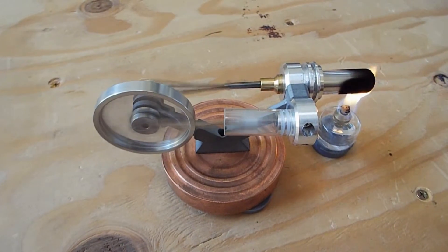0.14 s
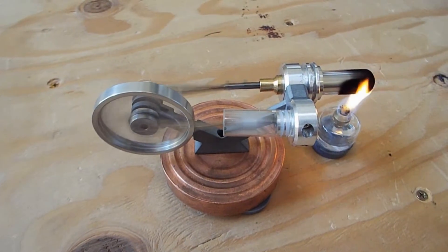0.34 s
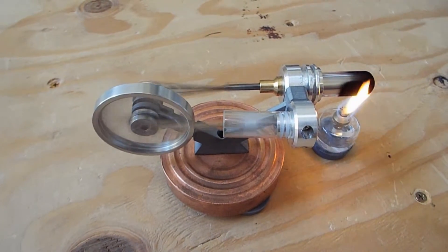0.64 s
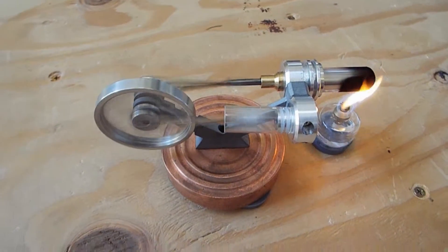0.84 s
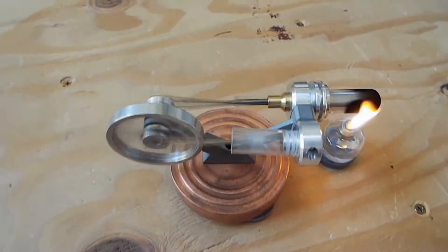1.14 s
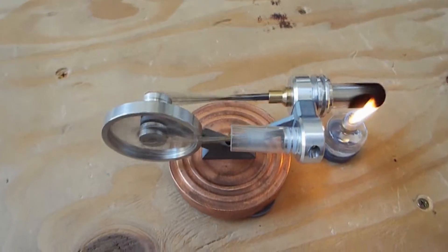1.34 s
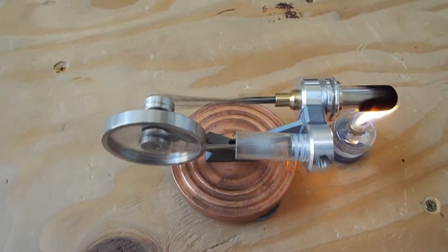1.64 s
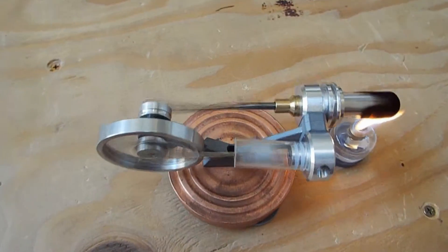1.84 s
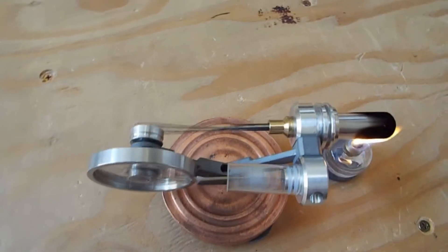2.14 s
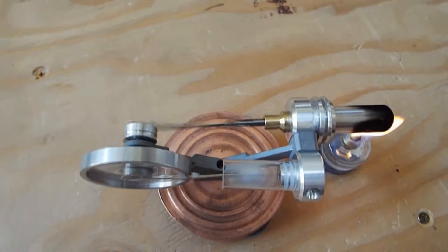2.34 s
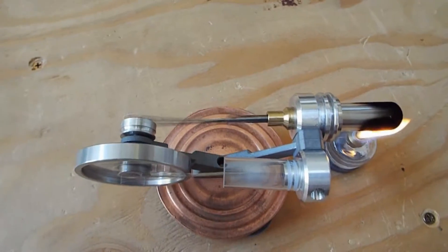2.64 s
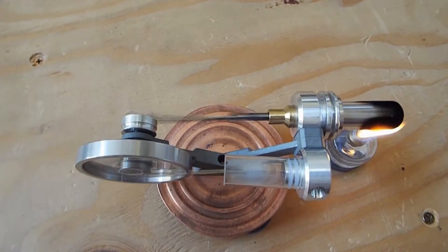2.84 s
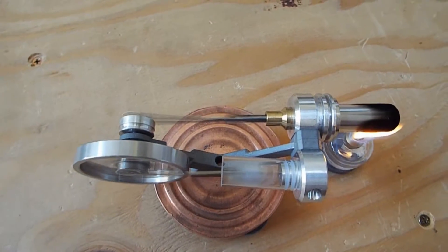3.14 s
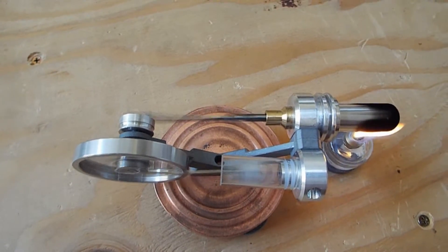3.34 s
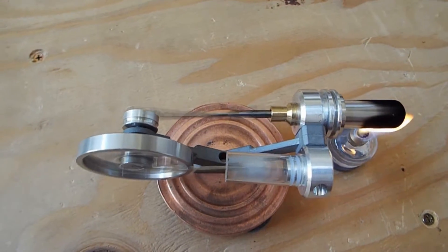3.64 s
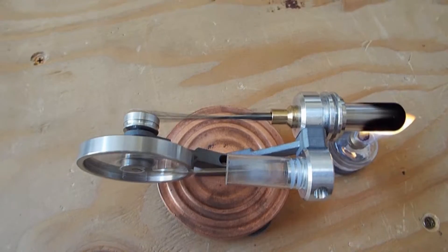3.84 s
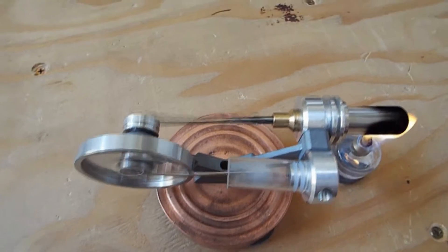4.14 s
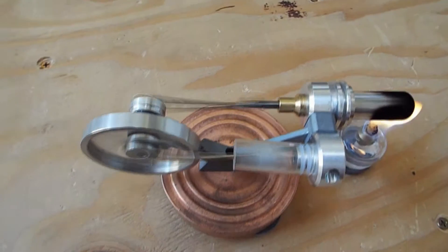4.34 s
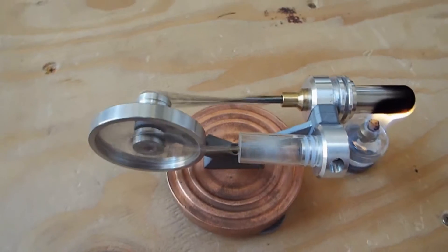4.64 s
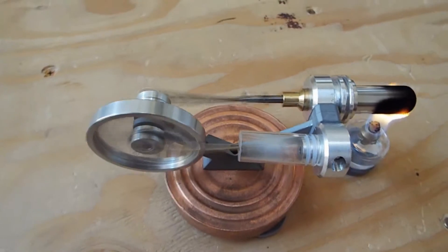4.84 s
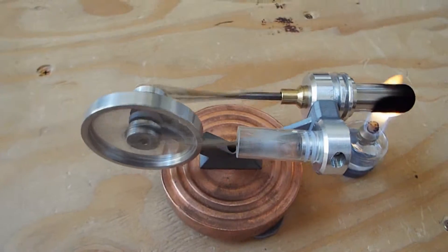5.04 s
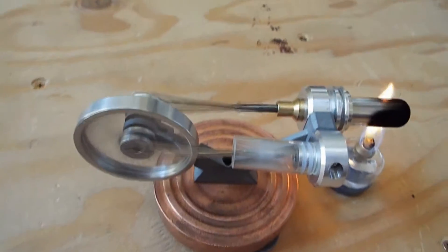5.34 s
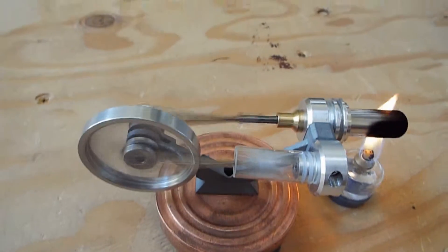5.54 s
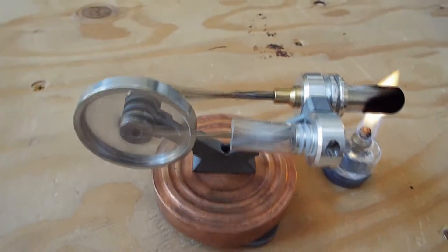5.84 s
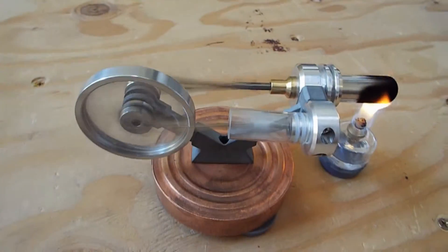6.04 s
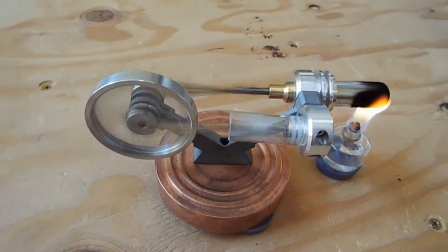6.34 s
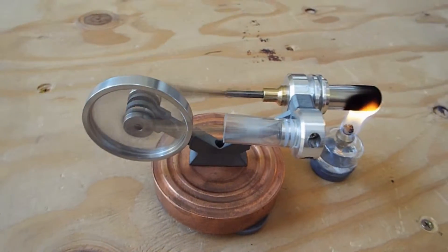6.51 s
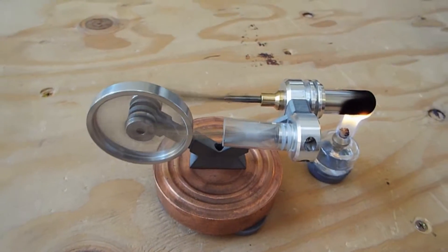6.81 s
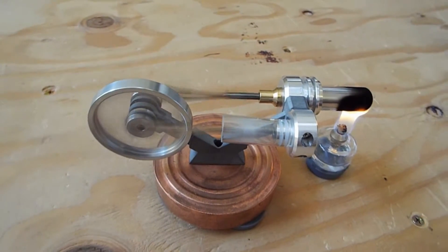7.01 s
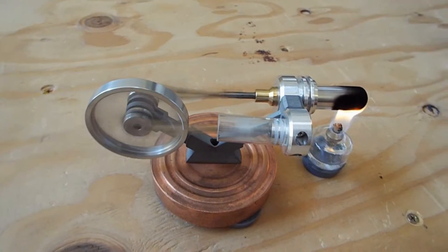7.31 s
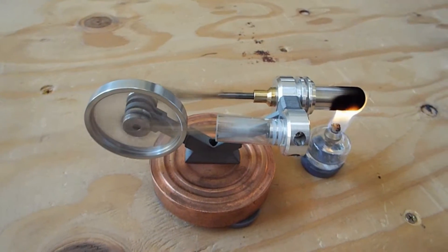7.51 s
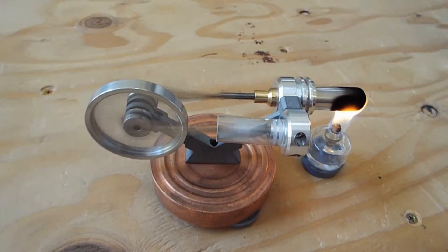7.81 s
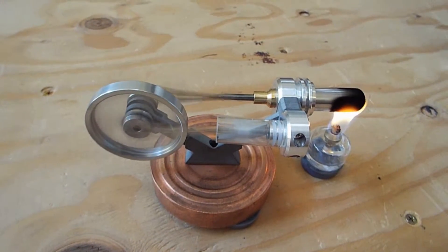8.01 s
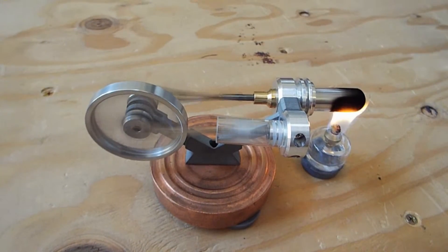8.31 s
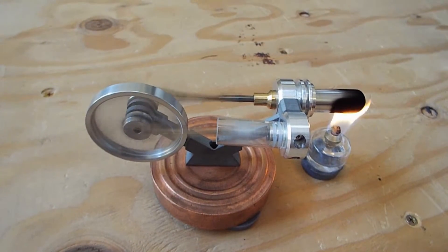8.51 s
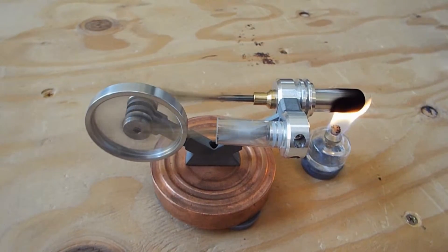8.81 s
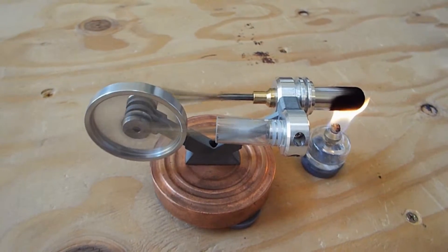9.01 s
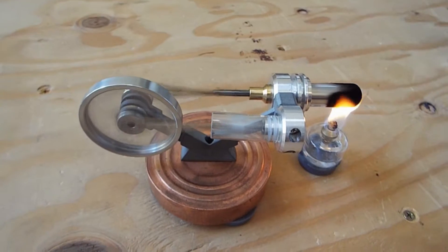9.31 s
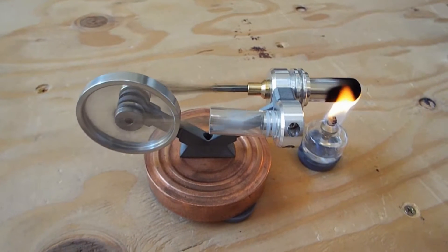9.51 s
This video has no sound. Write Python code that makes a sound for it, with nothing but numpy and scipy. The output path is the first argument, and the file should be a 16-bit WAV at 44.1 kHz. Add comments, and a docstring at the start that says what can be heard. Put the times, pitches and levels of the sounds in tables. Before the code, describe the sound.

From the start a small engine is already running at speed, close and dry: a fast, even metallic rattle, about twenty-six turns a second with several knocks per turn, ringing brightest around three to five kilohertz, with grainy rubbing and thin flickering whistles. It sits on the right. The left is a dull, covered rush with faint muffled engine. From 0.7 s sharp ticks and short buzzing trains crackle on the left, with quick dips in level; the left mutes at about 0.9-1.0 s, broken by a strong pop. The ring brightens around 1.5-4 s as the view tilts, with pops near 2.8-3.5 s. Crackling is dense from 4 to 6 s, with level sagging around 5.4-5.8 s and low puffs near 5.1 s. More puffs come at 7-7.9 s, then sparser ticks and soft thumps to 9 s. Crackle returns about 9-9.4 s, the left cuts out briefly at 9.5 s, and the engine runs on to the end at 9.7 s.

```python
"""Hot-air engine on a wooden table

A small engine spins close to a hand-held camera with two microphones, and the camera tilts round it.
Right: the linkage knocks four times a turn and rubs, ringing the metal frame; thin whistles flicker.
Left: a covered port passes a dull rush, low puffs and some engine sound through the camera body.
It crackles in even trains and lone ticks; the engine and rush sag in level, and the left mutes twice
but for the strong ticks and pops. The pops are louder on the left and fainter on the right."""
import sys
import numpy as np
from scipy import signal
from scipy.io import wavfile
from scipy.ndimage import uniform_filter1d

SR = 44100
rng = np.random.default_rng(int(sys.argv[2]) if len(sys.argv) > 2 else 0)


def wrap_up_sound(samples):
    """Save the sound to the file named by the first command line argument, as 16-bit audio."""
    columns = np.atleast_2d(samples).T
    # keep every value between -1 and 1, then stretch to whole-number steps
    tamed = np.clip(columns, -1, 1)
    steps = np.round(tamed * 32767).astype(np.int16)
    wavfile.write(sys.argv[1], SR, steps)


N = 426006
T = np.arange(N) / SR

# What each tilt of the camera hears, interpolated between rows; levels before each side's own gain:
# t/s, overall level/dB, then relative to it: low ring/dB, main ring/dB, upper rings/dB, top whistle/dB
VIEW_TABLE = [(0.0, -43, 4, 11, 1, -15), (.7, -44, 2, 11, 1, -13), (1.2, -48, 2, 13, 3, -12),
              (1.55, -45, 1, 13, 4, -14), (2.0, -45, 3, 14, 6, -13), (2.6, -44, 1, 12, 4, -16),
              (3.7, -44, 2, 14, 6, -14), (4.45, -45.5, 4, 13, 4, -11), (4.8, -45, 3, 11, 3, -14),
              (5.2, -43, 3, 10, 3, -14), (5.4, -48, 3, 9, 2, -12), (5.75, -49, 4, 9, 2, -11),
              (6.05, -43, 5, 10, 1, -13), (7.0, -43.5, 5, 9, 1, -12), (8.2, -43, 5.5, 8, 2, -11),
              (9.0, -43.5, 5.5, 9, 1, -12), (9.3, -43, 4, 6, 1, -13), (9.66, -43, 4, 6, 1, -14)]

# Evenly spaced trains of left ticks, each starting just after the bottom of a dip in level:
# t/s of first tick, number of ticks (minus: jumps downward), first jump level/dB, dip depth/dB
TICK_TRAINS = [(.7476, -5, -23, 4), (.7999, 4, -25, 6), (.862, -3, -34, 9), (1.0266, 6, -38, 0),
               (1.0521, -12, -38, 0), (1.1337, -7, -32, 0), (1.1946, -6, -20, 6), (1.2478, 7, -29, 3),
               (1.3091, -4, -21, 3), (1.3504, 5, -29, 7), (1.4254, -3, -22, 4), (1.497, -5, -31, 6),
               (1.6257, 4, -23, 9), (1.6795, -4, -25, 1), (1.7439, 4, -24, 2), (1.7987, -3, -26, 4),
               (1.8631, 4, -23, 2), (1.9327, -4, -23, 10), (2.0469, -3, -24, 1), (2.271, 3, -26, 1),
               (2.4718, -3, -28, 2), (3.0009, -3, -27, 1), (3.0906, -4, -26, 1), (3.1841, 4, -30, 1),
               (3.3963, -4, -25, 1), (3.4394, 3, -25, 2), (3.5273, 6, -30, 1), (3.8227, -2, -24, 3),
               (3.9202, -3, -23, 10), (3.9466, 8, -22, 8), (3.9876, 3, -24, 5), (4.0503, -5, -27, 13),
               (4.1567, -3, -23, 4), (4.2053, 4, -30, 9), (4.2626, -3, -25, 1), (4.3115, 4, -29, 7),
               (4.359, -3, -25, 2), (4.41, -2, -27, 8), (4.4506, -5, -24, 3), (4.5026, 4, -27, 2),
               (4.5925, 4, -25, 1), (4.6714, 3, -25, 3), (4.965, 2, -28, 9), (4.9869, 4, -23, 7),
               (5.0489, -4, -27, 11), (5.1546, -3, -26, 11), (5.1802, -5, -28, 0), (5.2548, 4, -30, 10),
               (5.2892, 6, -26, 9), (5.3466, 5, -20, 5), (5.4282, -4, -24, 10), (5.4637, 4, -26, 4),
               (5.5734, -3, -27, 9), (5.6042, 6, -25, 8), (5.6479, 4, -23, 7), (5.6933, -5, -27, 6),
               (5.7348, -4, -21, 2), (5.7722, 3, -25, 1), (5.8105, -2, -26, 10), (5.8648, 14, -22, 10),
               (5.9802, -3, -25, 11), (6.0066, 5, -32, 3), (6.1163, -2, -24, 9), (6.1875, -3, -22, 1),
               (6.2309, 4, -23, 8), (6.3245, -4, -26, 9), (6.3967, 5, -22, 3), (6.4497, -3, -28, 1),
               (6.6655, 6, -27, 10), (6.7834, 2, -27, 6), (6.8879, 5, -24, 4), (6.9184, -4, -29, 5),
               (6.9598, 7, -23, 2), (7.265, -2, -27, 6), (7.4446, -3, -27, 1), (7.5124, 3, -28, 1),
               (7.699, 3, -25, 5), (7.774, 4, -22, 1), (8.0152, -4, -24, 3), (8.0597, 2, -27, 5),
               (8.2326, -5, -34, 6), (9.049, 3, -23, 2), (9.1, 2, -30, 10), (9.1359, -2, -22, 12),
               (9.1578, -7, -22, 2), (9.21, 2, -30, 10), (9.2598, 5, -23, 12), (9.3016, 7, -19, 6),
               (9.39, 3, -27, 10), (9.4159, -5, -25, 4), (9.626, 10, -45, 0)]
TICK_GAP_S = 160.5 / 44100


def undb(db):
    """Decibels to an amplitude factor."""
    return 10 ** (np.asarray(db) / 20)


def unit(x):
    """Scale to an RMS of 1."""
    return x / np.sqrt(np.mean(x ** 2))


def ring(x, hz, width):
    """One resonance, gain 1 at the centre."""
    return signal.lfilter(*signal.iirpeak(hz, hz / width, SR), x)


def ring_twice(x, hz, width):
    """The same resonance twice over, for steeper skirts."""
    return ring(ring(x, hz, width), hz, width)


def lowpass(x, order, hz):
    """Take off the treble above hz."""
    return signal.sosfilt(signal.butter(order, hz, fs=SR, output="sos"), x)


def bass_cut(x, hz):
    """Second-order bass cut, which turns a step into a spike with an undershoot."""
    return signal.lfilter(*signal.butter(2, hz, "high", fs=SR), x)


def curves(table):
    """Each column after the time column, interpolated over the whole scene."""
    s, *columns = np.transpose(table)
    return [np.interp(T, s, column) for column in columns]


def walk(rate):
    """Random levels held 1 / rate s and slewed; RMS 1."""
    hold = int(SR / rate)
    levels = np.repeat(rng.standard_normal(N // hold + 1), hold)
    return unit(uniform_filter1d(levels, hold)[:N])


def left_open():
    """Switch that is 0 while the left is muted and 1 elsewhere."""
    # from t/s, to t/s
    mute_spans = [(.876, 1.02), (9.508, 9.578)]
    return 1 - sum((T > start) & (T < end) for start, end in mute_spans)


def dips():
    """Gain that falls quickly, rests and climbs back at a steady rate; the deepest dip rules."""
    # sudden drops: rest from t/s, to t/s, depth/dB
    sudden_drops = [(.885, .93, 6.), (.985, 1.025, 33.), (9.598, 9.63, 36.)]
    fall_s, sudden_fall_s = .02, .008
    rest_s, lead_s = .012, .008  # the climb starts lead_s before the train
    recover_db_per_s = 230.
    rows = [(s - lead_s - rest_s, s - lead_s, db, fall_s) for s, _, _, db in TICK_TRAINS]
    rows += [(*row, sudden_fall_s) for row in sudden_drops]
    down_db = np.zeros(N)
    for start, end, db, fall in rows:
        db = max(db, 0)
        corners = [start - fall, start, end, end + db / recover_db_per_s]
        down_db = np.maximum(down_db, np.interp(T, corners, [0, db, db, 0]))
    return undb(-down_db)


def hand_rumble():
    """Faint rumble of the hand: noise round 50 Hz that wanders in level, left then right."""
    sides = []
    for db in (-66, -77):
        noise = unit(ring(rng.standard_normal(N), 50, 90))
        sides.append(noise * undb(db + 3 * walk(5.)))
    return np.array(sides)


def pops():
    """Pops, rounded ticks and low thumps: half-sine pushes through a bass cut, fainter on the right."""
    # t/s, push length/s, left peak level/dB, right peak level/dB
    pop_table = [(.9772, .0009, -14., -24.), (1.1005, .0009, -26., -45.), (2.7962, .0007, -22., -30.),
                 (2.873, .0005, -25., -38.), (2.984, .0004, -24., -40.), (3.0655, .0005, -26., -40.),
                 (3.104, .0005, -27., -40.), (3.380, .0003, -21., -40.), (3.5195, .0007, -26., -36.),
                 (5.402, .0003, -22., -40.), (5.4045, .0003, -22., -40.), (5.4077, .0003, -22., -40.),
                 (7.8595, .002, -36., -46.), (8.463, .003, -47., -60.), (8.63, .003, -41., -55.),
                 (8.882, .003, -43., -57.), (8.978, .003, -44., -58.)]
    out = np.zeros((2, N))
    age = np.arange(SR // 20) / SR
    for s, length, left_db, right_db in pop_table:
        push = np.sin(np.pi * np.clip(age / length, 0, 1))
        pop = bass_cut(push, 250)
        first = int(s * SR)
        out[:, first:first + len(age)] += np.outer(undb([left_db, right_db]), pop / pop.max())
    return out


def puffs(rise_s=.008):
    """Air stirring at the covered port: short low gusts with a duller rustle above."""
    # t/s, envelope peak/dB (before the gains of the two noise bands)
    puff_table = [(0.725, -46), (5.075, -49), (5.181, -46), (5.214, -43), (7.017, -47), (7.074, -45),
                  (7.109, -45), (7.499, -47), (7.554, -45), (7.593, -44), (7.657, -43), (7.707, -46),
                  (7.857, -45), (9.348, -46)]
    shape = np.zeros(N)
    for s, db in puff_table:
        span = slice(int(s * SR), int(s * SR) + SR // 8)
        age = np.clip((T[span] - s) / rise_s, 0, None)
        shape[span] += undb(db) * age * np.exp(1 - age)
    air = rng.standard_normal(N)
    gust = undb(3) * unit(ring_twice(air, 220, 180))
    rustle = undb(4) * unit(ring_twice(air, 680, 500))
    return shape * (gust + rustle)


def muffled():
    """What the covered left port lets through: a dull, grainy rush of noise in a few resonances."""
    # f/Hz, width/Hz, relative level/dB
    port_rings = [(520, 160, -4), (1000, 300, 0), (1950, 260, -1), (3000, 900, -3), (230, 120, -20)]
    rush = undb(2.5 * walk(120.)) * rng.standard_normal(N)
    dull = np.zeros(N)
    for k, (hz, width, db) in enumerate(port_rings):
        dull += (-1) ** k * undb(db) * unit(ring(rush, hz, width))  # neighbours in opposite senses
    return unit(lowpass(dull, 8, 3700)) + undb(-14) * rush


def train_jumps():
    """Evenly spaced jumps of the signal that weaken through each train."""
    fade_db = 7.  # from first tick to last
    jumps = np.zeros(N)
    for s, count, first_db, _ in TICK_TRAINS:
        n = abs(round(count))
        at = np.round((s + TICK_GAP_S * np.arange(n)) * SR).astype(int)
        heights = np.sign(count) * undb(first_db - np.linspace(0, fade_db, n))
        jumps[at[at < N]] += heights[at < N]
    return jumps


def crackle_jumps():
    """Clusters of loud lone jumps, unevenly spaced and varying in strength."""
    # t/s, cluster length/s, number of ticks (minus: jumps downward), typical jump level/dB
    crackle_table = [(.253, .026, -3, -23), (.7276, .0145, 4, -19), (.8348, .0069, 4, -18),
                     (1.1632, .0129, 3, -17), (1.2817, .007, 3, -18), (1.3835, .0024, 2, -19),
                     (1.4189, .0465, -2, -21), (1.5329, .0138, 2, -22), (1.5571, .014, -3, -21),
                     (1.7112, .0151, -4, -20), (1.7698, .0137, 3, -21), (1.8294, .017, -2, -20),
                     (2.0299, .0059, 2, -21), (2.1224, 0, 1, -20), (2.165, .07, -5, -21),
                     (2.2579, .0015, -2, -19), (2.4907, .0041, -2, -20), (2.5284, 0, 1, -18),
                     (2.7967, 0, 1, -19), (2.9334, .0084, 2, -22), (3.3746, 0, 1, -19),
                     (3.4213, 0, -1, -21), (3.52, .004, 2, -20), (3.7959, .0038, 2, -20),
                     (3.8882, .0182, -4, -22), (4.1184, .0051, 2, -17), (4.2423, .0075, 2, -21),
                     (4.2789, .0036, -2, -22), (4.3402, .0027, 2, -20), (4.3752, 0, -1, -20),
                     (4.43, 0, 1, -19), (4.4873, 0, -1, -20), (4.5262, 0, 1, -19), (4.5687, .003, -2, -21),
                     (4.6208, .0098, 3, -19), (4.652, .0093, -4, -21), (4.7061, 0, 1, -20),
                     (4.8515, .0046, 2, -20), (4.8937, .0097, -2, -18), (4.9443, .002, 2, -20),
                     (4.9741, 0, -1, -17), (5.0073, .0036, 3, -21), (5.1197, .0158, 6, -20),
                     (5.2151, .004, 2, -17), (5.2328, .0036, -2, -20), (5.2742, 0, -1, -21),
                     (5.31, .0199, -3, -15), (5.5071, .0074, 3, -20), (5.5357, .0036, -2, -21),
                     (5.5546, .0066, 5, -17), (5.59, .085, -3, -19), (5.7131, .0138, 2, -18),
                     (5.7865, .014, 6, -18), (5.9236, .0062, 3, -22), (6.0665, .0087, 4, -20),
                     (6.1024, .0073, -3, -23), (6.1888, .0122, -4, -19), (6.3042, .0043, 2, -20),
                     (6.3665, .0109, -3, -19), (6.6415, .0036, -2, -23), (6.7055, .0128, 3, -18),
                     (6.8511, .0155, -2, -18), (6.9432, .0037, -2, -18), (7.2336, .0036, -2, -22),
                     (7.4211, .0052, 2, -20), (7.5053, 0, -1, -18), (7.5493, 0, 1, -19),
                     (7.6695, .0109, -3, -19), (7.7515, .0051, -2, -16), (7.8116, .0036, 2, -22),
                     (7.9845, .0036, 2, -18), (8.0035, 0, 1, -20), (8.1442, .0184, -3, -18),
                     (8.3991, 0, 1, -20), (9.0133, .0157, -3, -18), (9.2807, .0143, -3, -20),
                     (9.4429, .0188, -4, -23)]
    spread_db, uneven = 1.5, .6  # uneven: how far the inner ticks stray, relative to 1/n of the length
    jumps = np.zeros(N)
    for s, length, count, db in crackle_table:
        n = abs(round(count))
        strength, drift = rng.standard_normal((2, n))
        stray = uneven / n * np.tanh(drift) * np.sin(np.linspace(0, np.pi, n))
        at = np.round((s + length * (np.linspace(0, 1, n) + stray)) * SR).astype(int)
        jumps[at] += np.sign(count) * undb(db + spread_db * strength)
    return jumps


def faint_jumps(trains, crackles, gain):
    """Fainter lone jumps that gather where ticks are dense but stay out of the trains themselves."""
    top_db, share, calm_per_s = -21.5, 2.4, 2.  # share: count per listed tick nearby
    busy = uniform_filter1d(1. * (trains + crackles != 0), size=SR // 5)
    between = uniform_filter1d(1. * (trains != 0), size=int(2 * TICK_GAP_S * SR)) < 1e-6
    happens = rng.random(N) < share * busy + calm_per_s / SR
    height = (2 * rng.random(N) - 1) * undb(top_db)
    return happens * height * gain * between


def ticks(gain):
    """Left crackle: small jumps of the signal made into spikes by the bass cut; gain sets the faint ones."""
    trains, crackles = train_jumps(), crackle_jumps()
    lone = crackles + faint_jumps(trains, crackles, gain)
    # lone ticks take a few samples to rise, so they are duller than the trains
    jumps = trains + signal.lfilter([.65], [1, -.35], lone)
    return bass_cut(np.cumsum(jumps), 520)


def through_body(right):
    """The engine through the camera body to the left: weaker, duller and a little late."""
    level_db, top_hz, lag_s = -14., 2600., .00039
    return undb(level_db) * lowpass(np.roll(right, int(lag_s * SR)), 6, top_hz)


def view_gains():
    """Gains by view column: 0 is steady, 1 to 4 are low ring, main ring, upper rings, top whistle."""
    return [np.ones(N)] + [undb(db) for db in curves(VIEW_TABLE)[1:]]


def whistles(view):
    """Thin whistles: noise through very narrow resonances, flickering in level."""
    # f/Hz, width/Hz, level/dB before the view, column of the view, flickers a second
    whistle_table = [(688, 6, -17, 0, 2), (5017, 6, -2.5, 0, 4), (5124, 5, -3.5, 0, 4),
                     (5224, 5, -4.5, 0, 4), (5329, 4, -6, 0, 4), (14876, 24, -4, 4, 25),
                     (15035, 18, -8, 4, 25), (15115, 22, -2.5, 4, 25), (15272, 24, -4, 4, 25)]
    out = np.zeros(N)
    for hz, width, db, column, rate in whistle_table:
        flicker = undb(3.5 * walk(rate))
        tone = unit(ring(rng.standard_normal(N), hz, width) * flicker)
        out += tone * undb(db) * view[int(column)]
    return out


def knock(turns, place, spread, spread_db, contact_s, blow_db):
    """One rattling contact a turn: a first blow, then chatter that swells and dies away."""
    whole = np.arange(np.ceil(turns[0]), turns[-1])
    stray, strength = rng.standard_normal((2, len(whole)))
    at = np.searchsorted(turns, whole + place + spread * stray)
    starts = np.bincount(at, undb(spread_db * strength), N + 1)[:N]
    keep = np.exp(-1 / (contact_s * SR))
    swell = signal.lfilter([3 * (1 - keep)], [1, -2 * keep, keep ** 2], starts)
    return unit(swell * rng.standard_normal(N) + undb(blow_db) * starts)


def linkage():
    """Forces on the frame: slack taken up at four places in the turn, then grainy rubbing."""
    # t/s, lag behind a steady shaft/turns
    shaft_lag = [(0.0, .611), (.59, .829), (.82, .929), (1.05, .993), (1.51, 1.067), (2.19, 1.214),
                 (2.65, 1.254), (3.11, 1.323), (3.34, 1.327), (4.03, 1.317), (4.26, 1.304), (4.48, 1.267),
                 (4.94, 1.245), (5.63, 1.15), (6.55, .782), (7.23, .71), (7.69, .643), (7.92, .583),
                 (8.61, .287), (8.84, .235), (9.06, .217), (9.66, .203)]
    # place in the turn/0-1, spread of place/turns, spread of strength/dB, contact/s,
    # first blow setting over the chatter/dB
    knock_table = [(-.012, .003, 1.3, .0007, 24), (.175, .004, 2., .0012, 21), (.36, .006, 3., .0006, 8),
                   (.69, .015, 3., .0016, 6)]
    turn_hz = 26.2
    turns = turn_hz * T - curves(shaft_lag)[0]
    rubbing = undb(3.3 * walk(150.)) * rng.standard_normal(N)
    return np.array([knock(turns, *row) for row in knock_table] + [unit(rubbing) * undb(12)])


def frame(forces, view):
    """The metal frame rings in its modes, each louder or softer with the view."""
    # f/Hz, width/Hz (each of two passes is 1.5 times as wide), level/dB before the view,
    # column of the view, drive from each of the four knocks/dB, drive from rubbing/dB
    frame_modes = [(400, 400, -16, 0, -3, -3, -6, -3, -6), (775, 110, -8.5, 0, -9, -2, -6, 0, -11),
                   (1250, 900, -13.5, 0, -3, -6, -6, -5, -8), (2550, 1300, -5, 0, -2, -6, -6, -5, -9),
                   (3200, 170, -.5, 1, -9, -2, -8, 0, -14), (3800, 900, -9, 2, 0, -3, -16, -10, -16),
                   (4560, 400, 2, 2, 0, -1.5, -18, -12, -20), (5150, 500, -2, 3, 0, -4, -12, -8, -13),
                   (5880, 260, -3.5, 3, 0, -8, -10, -6, -14), (6700, 1300, 0, 3, -2, -14, -8, -4, -12),
                   (9800, 3500, -4.5, 0, -5, -12, -3, -4, -10), (12700, 2400, -4, 0, -3, -12, -3, -4, -10)]
    out = np.zeros(N)
    for k, (hz, width, db, column, *drive_db) in enumerate(frame_modes):
        seen = view[int(column)]
        # the view acts on the knocks; the rubbing spreads evenly all round
        knocks = undb(drive_db[:-1]) @ forces[:-1] * (seen / seen.mean()) ** 1.25
        force = knocks + undb(drive_db[-1]) * forces[-1]
        mode = unit(ring_twice(force, hz, 1.5 * width))
        # neighbouring modes move in opposite senses
        out += (-1) ** k * mode * undb(db) * np.sqrt(np.mean(seen ** 2))
    return out


def engine():
    """Knocks and rubbing of the linkage ring the frame, with the whistles beside them."""
    view = view_gains()
    return frame(linkage(), view) + whistles(view)


def scene():
    """Left and right microphones, with the engine close on the right."""
    right_db, left_db = 6., -5.
    dip = dips()
    gain = undb(curves(VIEW_TABLE)[0]) * dip
    heard = left_open()
    right = engine() * gain * undb(right_db)
    rush = muffled() * gain * undb(left_db)
    left = heard * (rush + through_body(right) + puffs())
    left = left + ticks(np.sqrt(dip) * heard)
    # the mutes also silence the rumble on both sides, but not the pops
    return np.array([left, right]) + hand_rumble() * heard + pops()


def record(dry):
    """Peaks are clipped at 0.85, then the top is cut steeply."""
    top_hz = 15550
    top_cut = signal.ellip(8, .2, 70, top_hz, fs=SR, output="sos")
    return signal.sosfilt(top_cut, np.clip(dry, -.85, .85))


dry = scene()
out = record(dry)
wrap_up_sound(out)
```